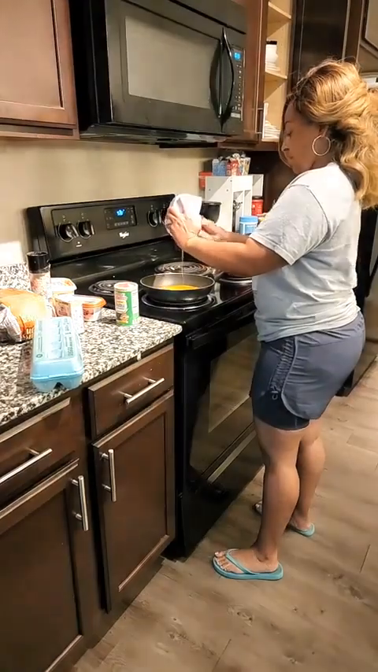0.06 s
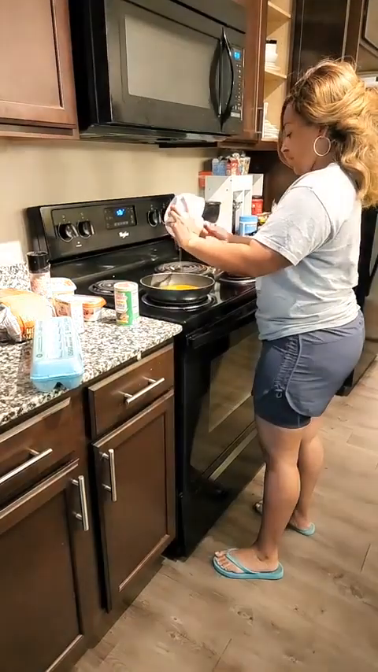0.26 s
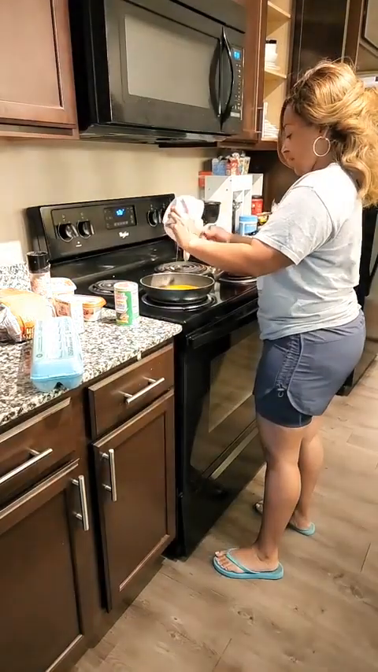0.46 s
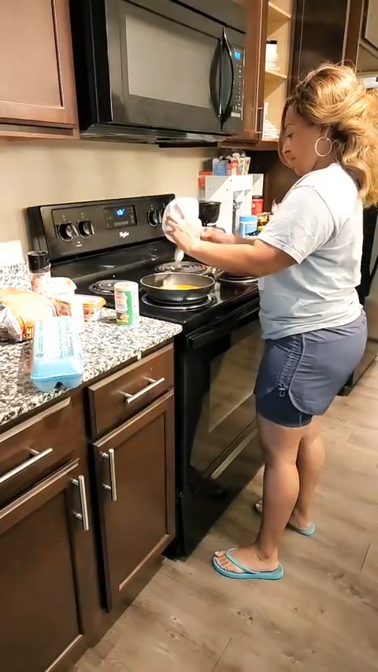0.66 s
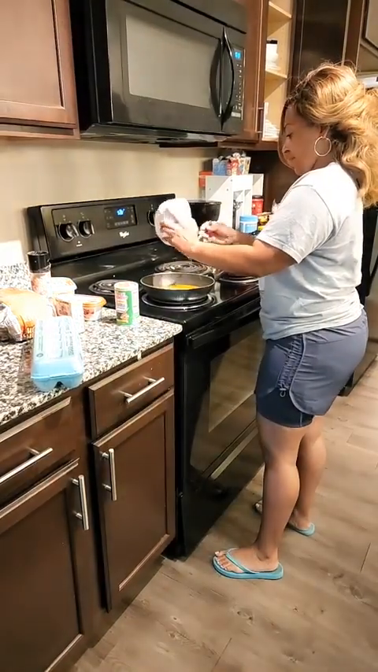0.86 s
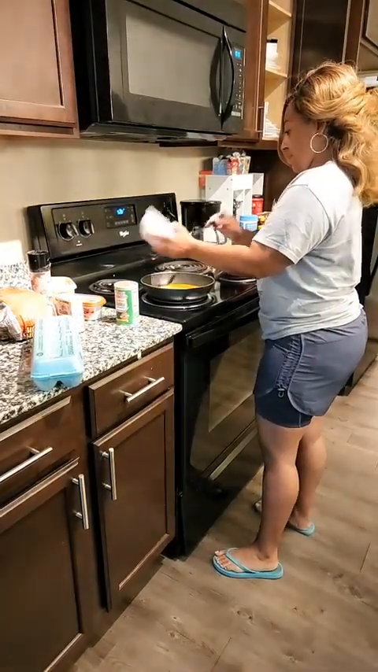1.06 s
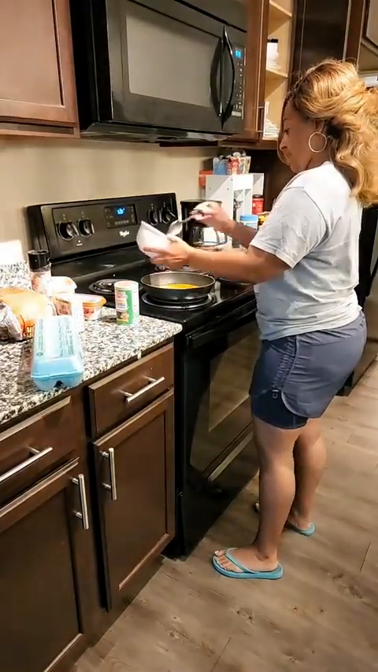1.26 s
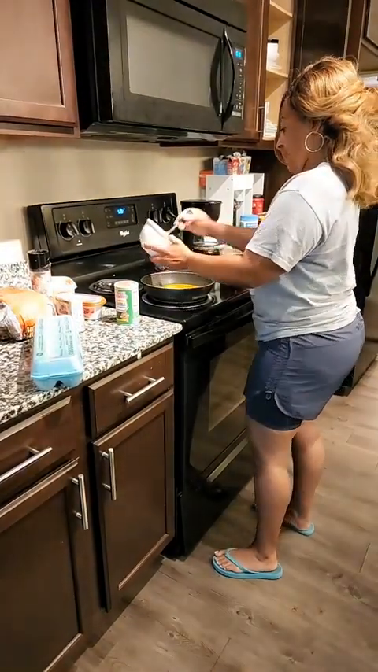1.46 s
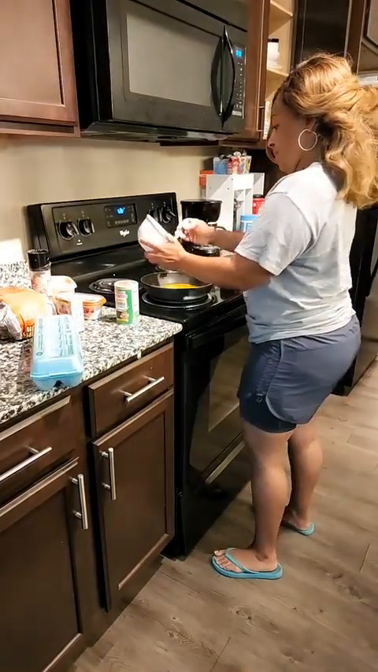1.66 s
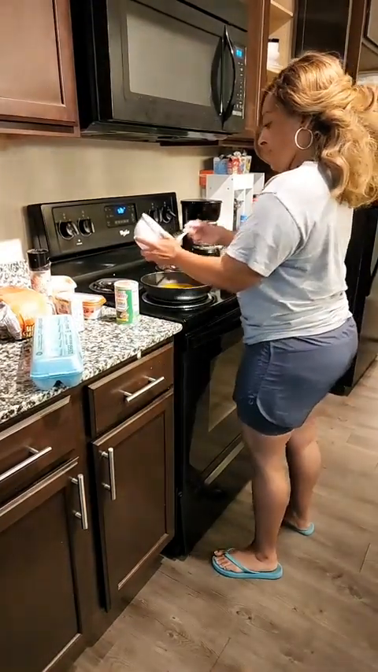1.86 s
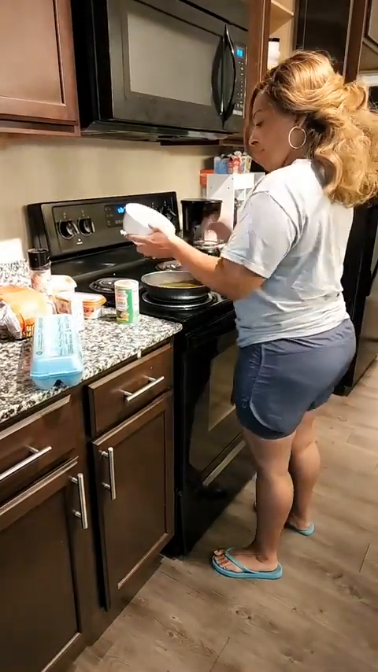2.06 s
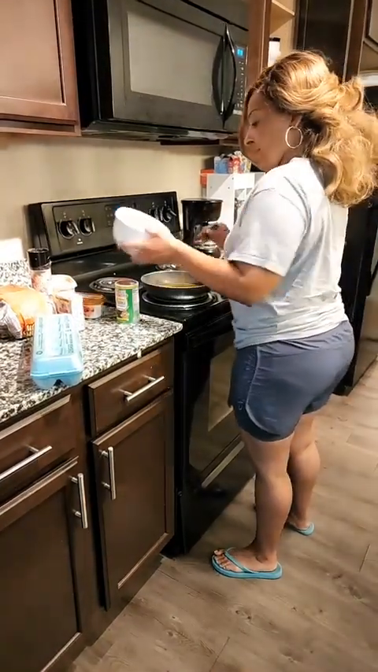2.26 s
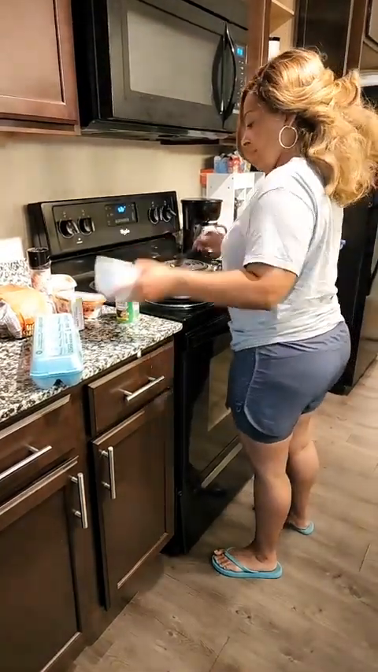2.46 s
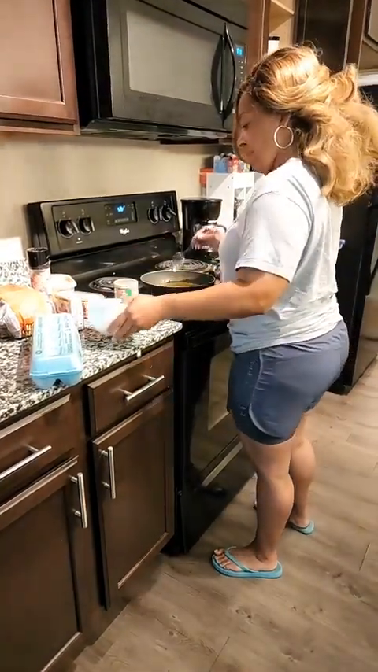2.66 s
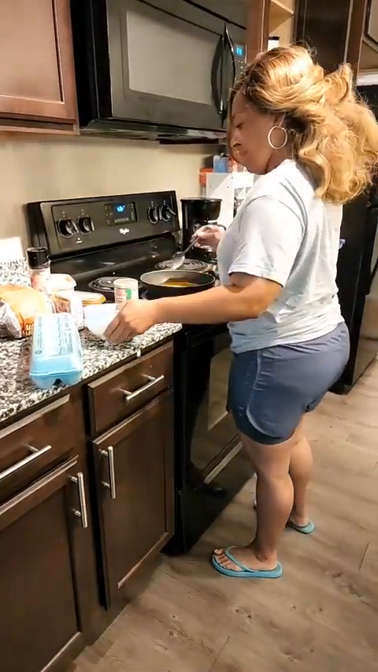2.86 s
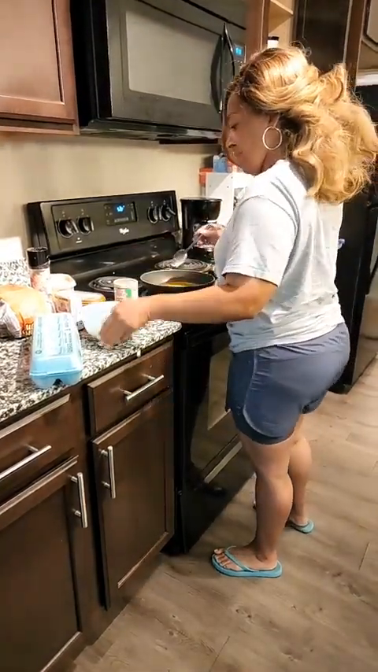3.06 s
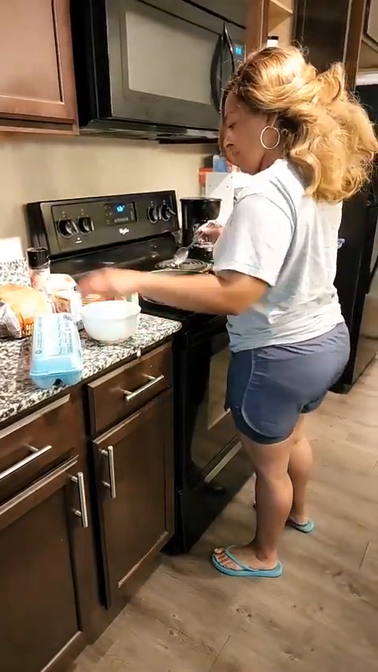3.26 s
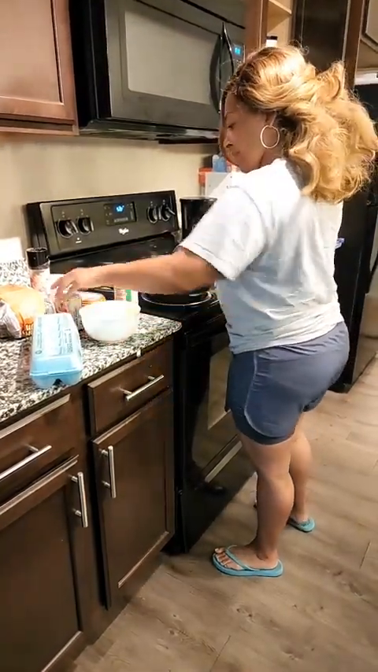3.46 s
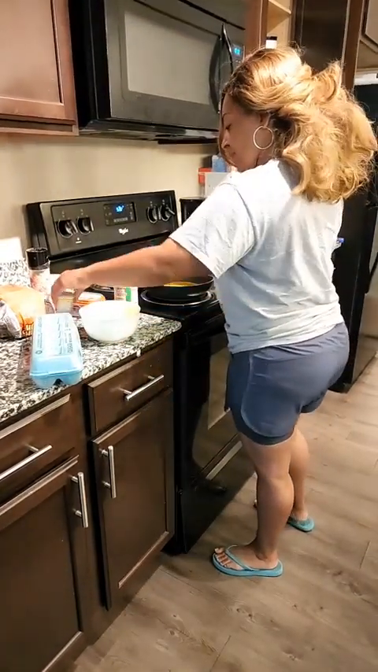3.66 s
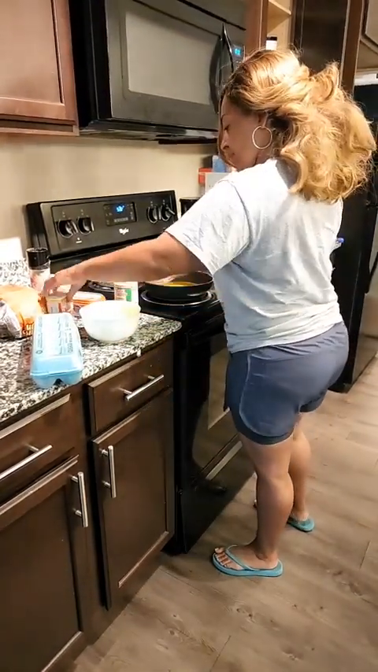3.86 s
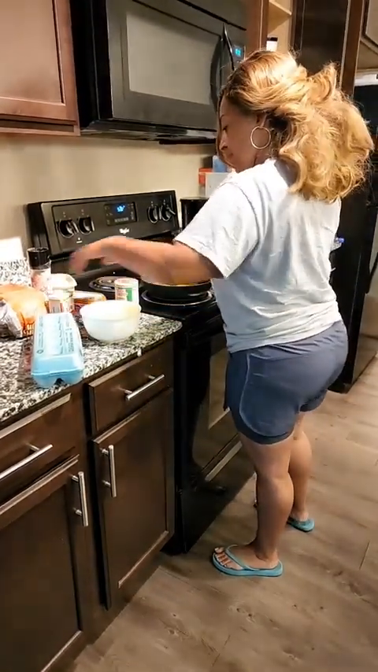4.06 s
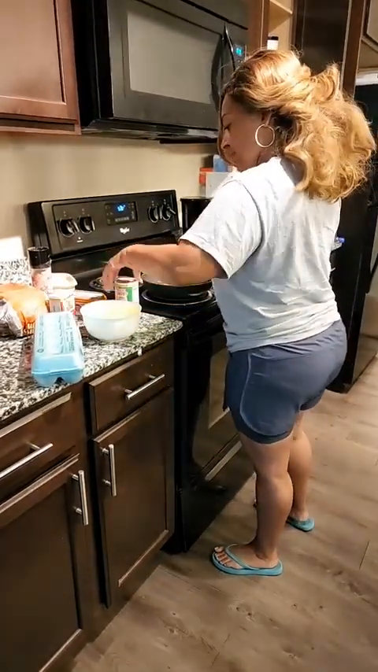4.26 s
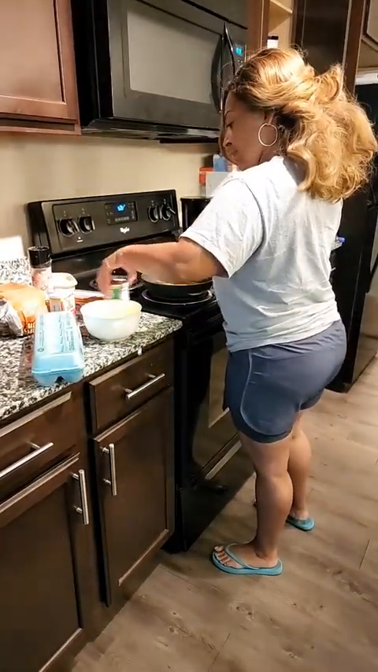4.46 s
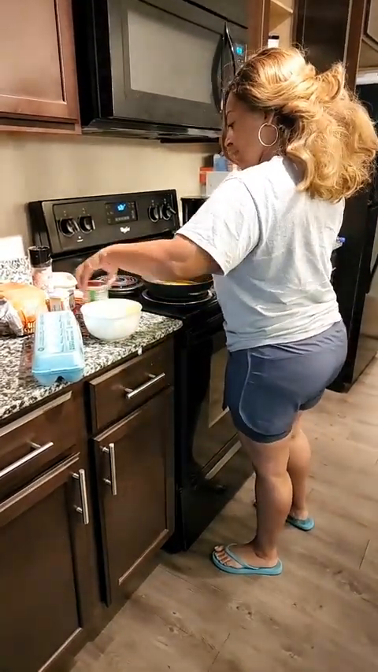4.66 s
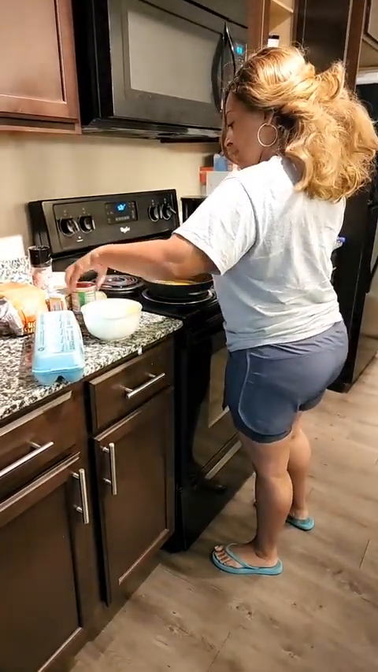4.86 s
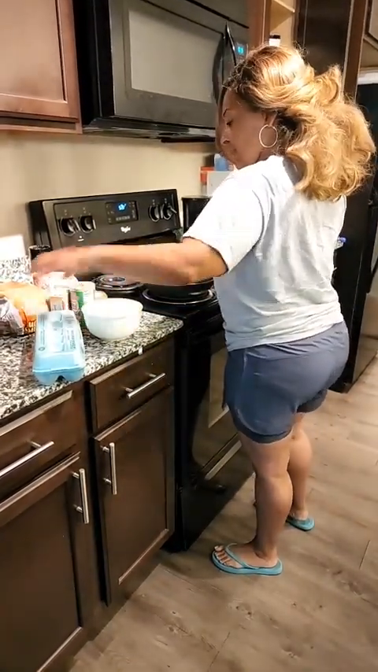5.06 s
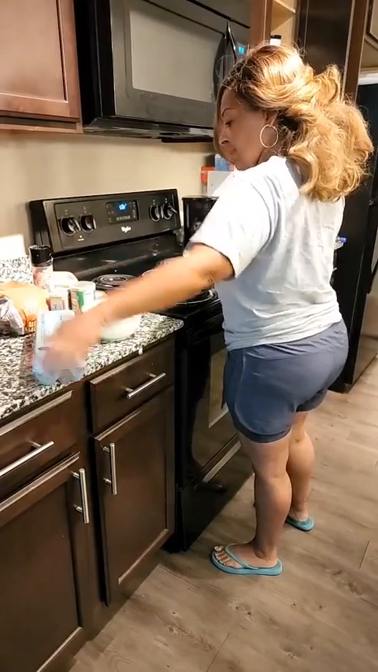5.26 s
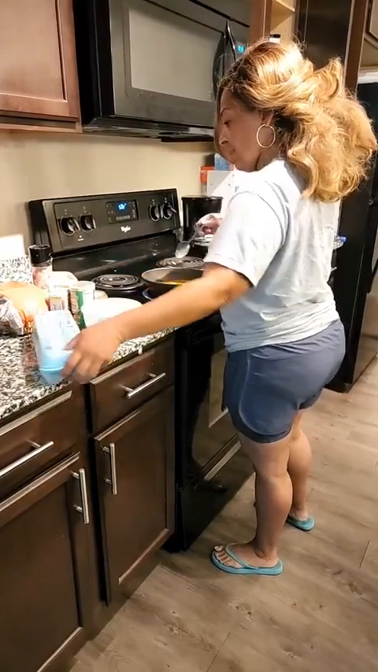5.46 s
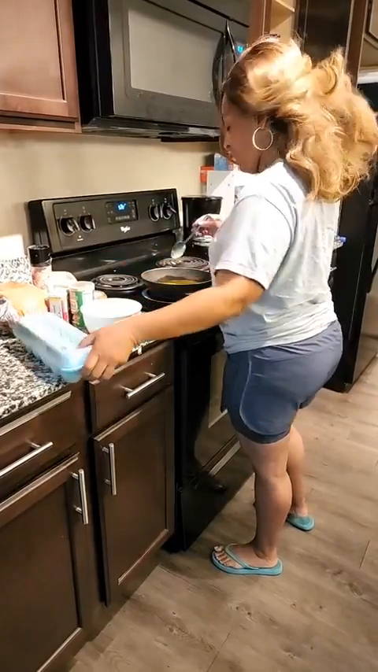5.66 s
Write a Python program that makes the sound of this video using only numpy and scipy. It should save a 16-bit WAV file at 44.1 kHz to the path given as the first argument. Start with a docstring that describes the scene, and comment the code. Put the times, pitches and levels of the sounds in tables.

```python
"""A fork clinks brightly on a china bowl as beaten egg is scraped into a skillet in a small kitchen.
The bowl then lands on the stone counter in two rocking double clanks; small things knock, tick and are wiped,
an egg carton scrapes along the counter, and an appliance hums low with a thin hiss.
Hits are clicks coloured by the struck body, plus dying sines for its ringing tones, heard through room echoes.
Wipes, the carton and the hum are shaped noise."""
import sys
import numpy as np
from scipy import signal
from scipy.fft import rfft, irfft, next_fast_len
from scipy.io import wavfile

SR = 44100
rng = np.random.default_rng(int(sys.argv[2]) if len(sys.argv) > 2 else 0)


def bounce(signal):
    """Save signal as a 16-bit WAV file at the path given by the first command-line argument."""
    frames = np.transpose(np.atleast_2d(signal))
    limited = np.clip(frames, -1, 1)
    pcm = np.round(limited * 32767).astype(np.int16)
    wavfile.write(sys.argv[1], SR, pcm)


N = 252252

# Fork against the held bowl. Each row: start in seconds, level in dB, treble tilt in dB per octave,
# place from 0 (base) to 1 (rim).
FORK_CLINKS = [(0.002, -56, 0.5, 0.42), (0.109, -40, 2.5, 0.05), (0.162, -41, 0, 0.23),
               (0.789, -22, 1.5, 1), (0.8, -29.5, 0, .8), (0.873, -42.5, -4, 1), (1.583, -28.5, 4.5, 0.076),
               (1.667, -27.5, -1, 0.39), (1.714, -36, 4, 0.22), (1.85, -52.5, -4, 0.65)]
# Thin single tones of the fork springing off the rim. Each row: start in seconds, pitch in Hz, level in dB,
# time to fade by 60 dB in seconds.
FORK_TINGS = [(0.002, 3310, -58.5, 0.18), (0.168, 1936, -56, 0.23), (0.215, 1990, -55.5, 0.13)]
# The bowl's foot comes down. Each row: start in seconds, level in dB, treble tilt in dB per octave,
# second touch over the first in dB, delay until it rocks back in seconds, hand's grip from 0 to 1.
BOWL_CLANKS = [(2.894, -23.5, -3.5, 2, 0.022, 0.72), (2.953, -28, -5.5, 4.5, .025, 0.96),
               (3.200, -15, 1.5, -7.5, .012, 0.8), (3.253, -19.5, 2.5, -2.5, 0.03, .05)]
# Small things put down and nudged. Each row: start in seconds, level in dB, treble tilt in dB per octave,
# hollow resonance in Hz, lift of that resonance in dB.
SMALL_KNOCKS = [(1.025, -52, -3.5, 272, 33), (3.64, -48, 1, 1580, 3), (3.916, -41, 1.5, 421, 3.5),
                (3.973, -59, 6.5, 4940, 12), (3.987, -42.5, 0, 633, 8), (4.049, -60.5, 10, 3980, 0),
                (4.405, -60.5, -3.5, 1710, 9), (4.632, -44.5, 2.5, 1030, 8.5), (4.911, -39.5, -1, 327, 15),
                (5.420, -56, 8.5, 594, 11.5), (5.478, -36.5, 4.5, 1290, -1.5)]
# Light wet ticks of egg and fingers. Each row: start in seconds, level in dB.
WET_TICKS = [(0.573, -53), (0.725, -54.5), (2.41, -54), (4.834, -46.5)]
# Soft wipes of the fork round the bowl and of the hand. Each row: middle in seconds, level in dB.
SOFT_WIPES = [(0.47, -56), (1.138, -56.5), (1.261, -53.5), (2.185, -60.5), (2.32, -55.5), (2.479, -61.5),
              (4.35, -62.5)]
# Low drones that swell and fade. Each row: pitch in Hz, width in Hz, level in dB,
# loudest moment in seconds, half length in seconds.
LOW_DRONES = [(135, 3, -71, 5.2, 1), (149, 2.5, -71, 1.5, 3), (300, 18, -72, 4, 3),
              (300, 24, -64, 5.24, .12), (420, 70, -63, 3.85, .07)]

# Ringing tones (modes) of each struck body. Each row: pitch in Hz, level in dB,
# time to fade by 60 dB in seconds.
# The rim's bending tones, then their twins and shorter neighbours:
RIM_MODES = [(1063, -8, .5), (2506, 2.5, .2), (4454, 0, .1), (6857, -3.5, .12), (13606, -14, .12),
             (1112, -14, .08), (2430, -3, .08), (2530, -1, .05), (4410, -1, .07), (4495, -1, .06),
             (2620, -6, .03), (4800, -6, .015), (6600, -13, .03), (9600, -13, .07), (11100, -18, .04)]
# The bowl struck inside, near its base:
BASE_MODES = [(5075, 0, .13), (7825, -3, .15), (5130, 0, .025), (7930, -4, .03), (1195, -23, .2),
              (5432, -14, .1), (6810, -12, .06), (8500, -11, .008), (11850, -11, .02), (14620, -6, .025),
              (15300, -6, .008)]
# The bowl struck on its foot:
FOOT_MODES = [(5080, -1, .09), (5130, 0, .025), (7825, 1, .16), (7930, 0, .04), (10700, -14, .008),
              (11480, -15, .03), (14620, -12, .04)]
# The counter:
COUNTER_MODES = [(151, -6, .4), (187, -6, .3), (263, -2, .3), (315, 0, .22), (863, 0, .12), (1224, -4, .15),
                 (1723, -2, .14), (1888, -3, .15), (97, -9, .25), (135, -6, .3), (224, -6, .25),
                 (296, -3, .15), (385, -8, .1), (930, -3, .04)]

# Colours of the noisy sounds. Each row: frequency in Hz, level in dB per Hz.
# Fork's crack on the bowl:
CRACK_COLOUR = [(100, -30), (500, -26), (800, -16.5), (1100, -6.5), (1450, -11), (2100, -2), (4900, -4),
                (6100, -13), (7000, -10), (9800, -14), (11000, -14.5), (12600, -10.5), (14500, -2.5),
                (16000, -9.5)]
# Bowl's clank on the counter:
CLANK_COLOUR = [(40, -19), (130, -6), (330, 0.5), (550, -10), (880, 5.5), (1300, 2.5), (1900, 3),
                (2600, -8.5), (3300, -10.5), (4700, -19.5), (6000, -54), (7200, -28), (9200, -40.5),
                (11000, -24), (12800, -44.5), (14700, -27.5), (16000, -37.5)]
# Knock of a small thing:
KNOCK_COLOUR = [(60, -18), (220, -2), (380, 3), (1000, -0.5), (1800, -4), (3000, -18), (6000, -31.5),
                (15000, -38)]
# Carton rubbing on the counter:
SCUFF_COLOUR = [(100, -9.5), (600, -8.5), (1500, -2), (3000, -5.5), (5000, -10), (7000, -16), (10000, -17),
                (15000, -16.5)]
# Wipes and wet ticks:
WIPE_COLOUR = [(500, -18.5), (3000, -15.5), (7000, -6.5), (10000, -6.5), (15000, 3)]
# Steady background of the room:
AIR_COLOUR = [(15, -66.5), (25, -38.5), (48, -7), (92, -14), (145, -6.5), (263, -13), (301, -4.5),
              (384, -19.5), (695, -29.5), (1290, -31.5), (2000, -28), (3620, -35), (5430, -31.5),
              (14800, -25), (16000, -21.5)]

# How long the kitchen echoes. Each row: frequency in Hz, time to fade by 60 dB in seconds.
KITCHEN_FADE = [(100, 0.3), (300, 0.42), (1000, 0.37), (3000, 0.45), (7000, 0.41), (15000, 0.15)]
# Colour difference of the microphones. Each row: frequency in Hz, left over right in dB.
MIC_LEAN = [(60, -0.5), (130, 3), (380, 0), (650, 3), (1200, -1.5), (2400, 1), (4400, -1.5), (7500, 8),
            (10500, -0.5), (15000, 3)]
# How alike noise is at the two microphones. Each row: frequency in Hz, correlation (1 = the same).
MIC_LIKENESS = [(60, .98), (250, .95), (500, .65), (1000, .4), (2000, .15), (5000, .05), (15000, .1)]

RIM_RING_DB, BASE_RING_DB = 3.5, -2   # ring over crack, for a blow right on that part
RIM_TILT_DB, INWARD_DULLING_DB = 3.5, 14   # per octave: bright at the rim, darker from further in
HELD_T60_S = 0.15   # the hand lets no rim tone ring longer
SECOND_TOUCH_S, ROCK_LOSS_DB = .0075, 6.5
THUD_DB, THUD_GRIP_LOSS_DB = -1, 9.5   # counter's thud over the clank; the hand softens the landing
BOWL_RING_DB, RING_GRIP_LOSS_DB = 0.5, 22.5   # rim's ring over the clank; the hand damps it
FOOT_PING_DB, PING_PER_TILT_DB = -15.5, 1.46   # foot's ping over the clank; harder contacts ping more
SETTLE_S, SETTLE_LOSS_DB = 0.04, 11.5   # each small thing tips onto its other edge
WIPE_HALF_S = 0.039
SLIDE_START_S, SLIDE_STOP_S, SLIDE_ATTACK_S, SLIDE_DB = 5.445, 5.69, 0.027, -49
JERK_DB, JERK_S, SLOWING_DB_PER_S = 11, .04, 190   # extra at the start, how long it eases, fade as it slows
AIR_DB = -61
CUTOFF_HZ = 15850
SPAN = 32768   # samples kept for each hit
AGE = np.arange(SPAN) / SR   # seconds since the hit


def from_db(db):
    """Turn decibels into gain."""
    return 10 ** (np.asarray(db) / 20)


def at_hz(points, hz):
    """Read a table between its rows, on a log-frequency axis."""
    points = np.array(points)
    return np.interp(np.log(np.maximum(hz, 1)), np.log(points[:, 0]), points[:, 1])


def bins(size):
    """Frequencies in the spectrum of that many samples, never below 10 Hz."""
    return np.maximum(np.fft.rfftfreq(size, 1 / SR), 10)


def unit_blow(x):
    """Scale a hit to the energy of 30 ms at rms 1."""
    energy = np.mean(np.sum(x ** 2, axis=-1))
    return x / np.sqrt(energy / (.03 * SR) + 1e-30)


def add(out, s, sound):
    """Mix a sound in at a time in seconds."""
    start = int(np.clip(round(s * SR), 0, N - 1))
    out[:, start:start + SPAN] += sound[:, :N - start]


def panned(x, left_db):
    """Lean to the left by so many dB."""
    return x * from_db([[left_db / 2], [-left_db / 2]])


def diffuse(size):
    """Spectrum of white noise at two microphones, alike in the bass and nearly unrelated in the treble."""
    mid, side = rfft(rng.standard_normal((2, size)))
    alike = np.clip(at_hz(MIC_LIKENESS, bins(size)), -.99, .99)
    shared = np.sqrt(1 + alike) * mid
    opposed = np.sqrt(1 - alike) * side * [[1], [-1]]
    return (shared + opposed) / np.sqrt(2)


def noise(spectrum):
    """Steady stereo noise of a given colour, rms 1."""
    x = irfft(diffuse(N) * from_db(at_hz(spectrum, bins(N))), N)
    return x / x.std()


def kitchen(direct_db, near_t60, tail_db):
    """Path to the microphones: direct sound, a flurry off counter and cupboards, then the room's tail."""
    field = diffuse(SPAN)
    octave = np.clip(np.log2(bins(SPAN) / 125), 0, 7)
    tail = 0
    for k in range(8):   # each octave band fades at its own speed
        band = irfft(field * np.maximum(1 - abs(octave - k), 0))
        fade_s = at_hz(KITCHEN_FADE, 125 * 2 ** k)
        tail = tail + band * np.exp(-np.log(1000) * AGE / fade_s)
    tail = tail * (1 - np.exp(-AGE / 0.012))   # builds up gradually
    near = irfft(diffuse(SPAN)) * from_db(-60 * AGE / near_t60)
    near = near * (1 - np.exp(-AGE / .001))
    direct = unit_blow(1. * (AGE == 0))
    return unit_blow(near) + from_db(tail_db) * unit_blow(tail) + from_db(direct_db) * direct


def blow(colour_db, path):
    """A click through a heavily damped body (minimum phase: nothing sounds early) and along a path."""
    cepstrum = irfft(np.log(from_db(colour_db)))
    cepstrum[1:SPAN // 2] *= 2   # folding the second half onto the first gives minimum phase
    cepstrum[SPAN // 2 + 1:] = 0
    body = np.exp(rfft(cepstrum))
    return unit_blow(irfft(rfft(path) * body))


def tilted(spectrum, tilt_db):
    """A harder contact lifts the treble against the bass; the tilt acts above 400 Hz."""
    octaves = np.log2(np.maximum(bins(SPAN), 400) / 1000)
    return at_hz(spectrum, bins(SPAN)) + tilt_db * octaves


def crowd(depth_db, spacing_hz):
    """A body's many weak modes: uneven peaks and dips in dB, new for every spot that is struck."""
    return depth_db * np.interp(bins(SPAN) / spacing_hz, np.arange(SPAN), rng.standard_normal(SPAN))


def ringing(modes, path):
    """Each mode as a dying sine that builds up within a cycle or two: (modes, channels, samples)."""
    rings = []
    for hz, _, t60 in modes:
        envelope = (1 - np.exp(-2 * hz * AGE)) ** 2 * from_db(-60 * AGE / t60)
        sine = envelope * np.sin(2 * np.pi * hz * AGE)
        heard = signal.fftconvolve(path, sine[None], axes=1)[:, :SPAN]
        rings.append(unit_blow(heard))
    return np.array(rings)


def strike(modes, rings, tilt_db, contact_hz=SR, scatter_db=1):
    """Every blow gives each mode a new strength and sign; a soft contact leaves the highest ones still."""
    hz, db, _ = np.transpose(modes)
    chance = rng.standard_normal((len(modes), 2))
    strength = from_db(db + tilt_db * np.log2(hz) + scatter_db * chance[:, 0])
    gains = strength * np.sign(chance[:, 1])
    gains = gains / (1 + (hz / contact_hz) ** 4)
    return np.tensordot(gains / np.linalg.norm(gains), rings, 1)


def fork_on_bowl():
    """Steel on china: a bright crack, after which rim and base share the ring by where the fork lands."""
    out = np.zeros((2, N))
    path = kitchen(direct_db=-12, near_t60=0.13, tail_db=-8.0)
    held_rim = [(hz, db, min(t60, HELD_T60_S)) for hz, db, t60 in RIM_MODES]
    rim, base = ringing(held_rim, path), ringing(BASE_MODES, path)
    for s, db, tilt_db, place in FORK_CLINKS:
        inward = np.clip(1 - place, 0, 1)
        colour_db = tilted(CRACK_COLOUR, tilt_db) + crowd(depth_db=5, spacing_hz=70)
        crack = blow(colour_db, kitchen(direct_db=-9.5, near_t60=0.13, tail_db=-3.5))
        rim_tilt_db = RIM_TILT_DB - INWARD_DULLING_DB * inward
        rim_ring = (1 - inward) * from_db(RIM_RING_DB) * strike(RIM_MODES, rim, rim_tilt_db)
        base_ring = inward * from_db(BASE_RING_DB) * strike(BASE_MODES, base, 0)
        add(out, s, from_db(db) * (crack + rim_ring + base_ring))
    for s, hz, db, t60 in FORK_TINGS:
        ting = ringing([(hz, db, t60)], path)[0]
        add(out, s, from_db(db) * ting)
    return panned(out, left_db=-1.0)


def bowl_on_counter(rim_tilt_db=-15):
    """The foot touches twice and rocks back: counter thuds, foot pings, the rim's lowest tones ring on."""
    out = np.zeros((2, N))
    path = kitchen(direct_db=-4.0, near_t60=.06, tail_db=-5.0)
    low_rim = RIM_MODES[:2]
    counter, rim, foot = ringing(COUNTER_MODES, path), ringing(low_rim, path), ringing(FOOT_MODES, path)
    for s, db, tilt_db, second_db, rock_s, grip in BOWL_CLANKS:
        touches = [(0, 0), (SECOND_TOUCH_S, second_db), (rock_s, -ROCK_LOSS_DB)]
        for delay_s, touch_db in touches:
            colour_db = tilted(CLANK_COLOUR, tilt_db) + crowd(depth_db=2.5, spacing_hz=35)
            clank = blow(colour_db, kitchen(direct_db=-19.5, near_t60=.06, tail_db=-4))
            thud_db = THUD_DB - THUD_GRIP_LOSS_DB * grip
            thud = from_db(thud_db) * strike(COUNTER_MODES, counter, 0)
            ping_db = FOOT_PING_DB + PING_PER_TILT_DB * tilt_db
            ping = from_db(ping_db) * strike(FOOT_MODES, foot, 3 * tilt_db)
            add(out, s + delay_s, from_db(db + touch_db) * (clank + thud + ping))
        ring_db = db + BOWL_RING_DB - RING_GRIP_LOSS_DB * grip
        add(out, s, from_db(ring_db) * strike(low_rim, rim, rim_tilt_db))
    return panned(out, left_db=-0.5)


def small_things():
    """Knocks of light containers, each with one hollow resonance and a softer touch as it settles."""
    out = np.zeros((2, N))
    for s, db, tilt_db, hollow_hz, lift_db in SMALL_KNOCKS:
        octaves_away = np.log2(bins(SPAN) / hollow_hz)
        hollow_db = lift_db / (1 + (octaves_away / 0.29) ** 2)
        for delay_s, loss_db in (0, 0), (SETTLE_S, SETTLE_LOSS_DB):
            colour_db = tilted(KNOCK_COLOUR, tilt_db) + hollow_db + crowd(depth_db=3, spacing_hz=60)
            knock = blow(colour_db, kitchen(direct_db=-7, near_t60=.08, tail_db=-3))
            add(out, s + delay_s, from_db(db - loss_db) * knock)
    return panned(out, left_db=0.5)


def ticks_and_wipes(grain_db=3.5, grains_per_s=300):
    """Tiny soft contacts and short scrapes, mostly treble; a random wobble in level makes the scrapes grainy."""
    t = np.arange(N) / SR
    swell = sum(from_db(db) * np.exp(-((t - s) / WIPE_HALF_S) ** 2) for s, db in SOFT_WIPES)
    grains = np.interp(t * grains_per_s, np.arange(SPAN), rng.standard_normal(SPAN))
    out = swell * from_db(grain_db * grains) * noise(WIPE_COLOUR)
    for s, db in WET_TICKS:
        tick = blow(tilted(WIPE_COLOUR, 0), kitchen(direct_db=-19.5, near_t60=0.09, tail_db=-2))
        add(out, s, from_db(db) * tick)
    return out


def carton(grain_db=1.5, slips_per_s=170):
    """Friction noise: a jerk into motion, a steady slide, then slowing, made grainy by small uneven slips."""
    t = np.arange(N) / SR
    since = np.maximum(t - SLIDE_START_S, 0)
    jerk_db = JERK_DB * np.exp(-since / JERK_S)
    slowing_db = SLOWING_DB_PER_S * np.maximum(t - SLIDE_STOP_S, 0)
    level_db = SLIDE_DB + jerk_db - slowing_db
    slips = np.interp(t * slips_per_s, np.arange(SPAN), rng.standard_normal(SPAN))
    attack = np.minimum(since / SLIDE_ATTACK_S, 1)
    return attack * from_db(level_db + grain_db * slips) * noise(SCUFF_COLOUR)


def room_tone():
    """Low appliance rumble and a thin hiss as steady noise, with wavering drones as narrow bands of noise."""
    out = from_db(AIR_DB) * noise(AIR_COLOUR)
    t = np.arange(N) / SR
    for hz, width, db, s, half in LOW_DRONES:
        drone = irfft(diffuse(N) / (1 + ((bins(N) - hz) / width) ** 2), N)
        swell = np.exp(-((t - s) / half) ** 2)
        out += from_db(db) * swell * drone / drone.std()
    return out


def scene():
    """Everything at the stove and counter, from the fork down to the room."""
    return fork_on_bowl() + bowl_on_counter() + small_things() + ticks_and_wipes() + carton() + room_tone()


def record(dry, right_lag_s=.00018):
    """Two microphones differ in colour, the right one hears a little later, and the top is cut steeply."""
    size = 2 * next_fast_len((N + SPAN) // 2)
    hz = bins(size)
    left, right = rfft(dry, size)
    lean = from_db(at_hz(MIC_LEAN, hz) / 2)   # half raises the left, half lowers the right
    lag = np.exp(-2j * np.pi * hz * right_lag_s)
    heard = irfft(np.array([left * lean, right / lean * lag]))[:, :N]
    top_cut = signal.ellip(12, .2, 80, CUTOFF_HZ, fs=SR, output="sos")
    return signal.sosfilt(top_cut, heard)


dry = scene()
out = record(dry)
bounce(out)
```